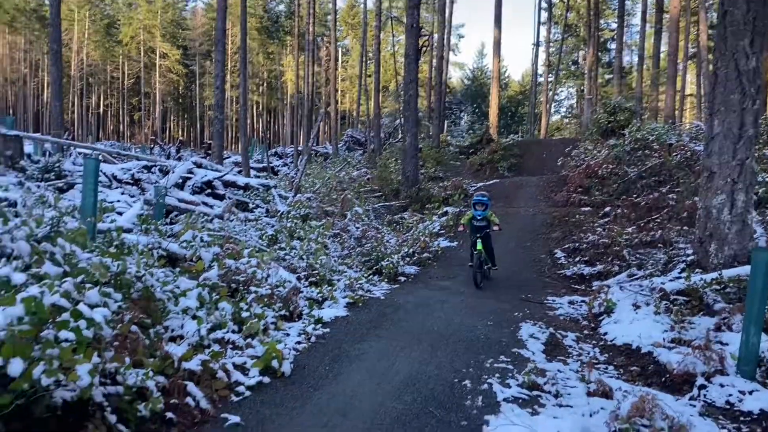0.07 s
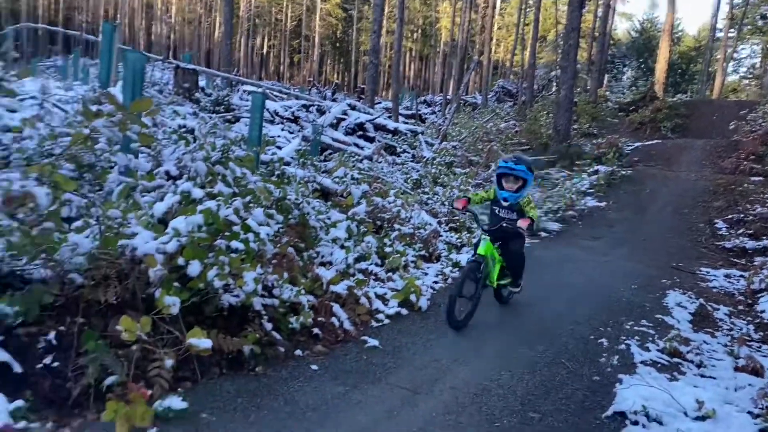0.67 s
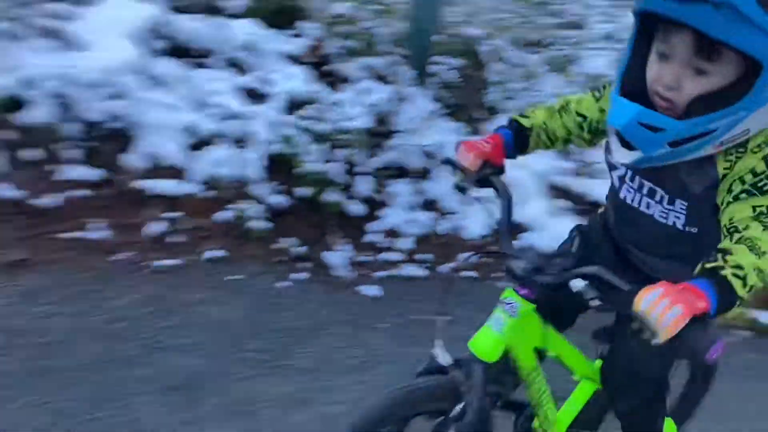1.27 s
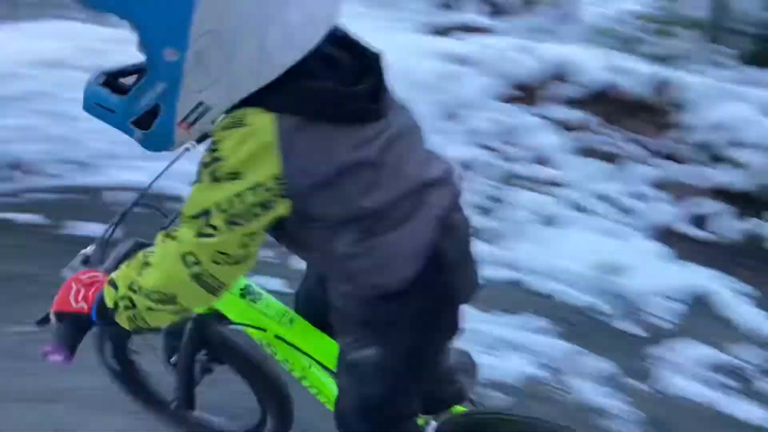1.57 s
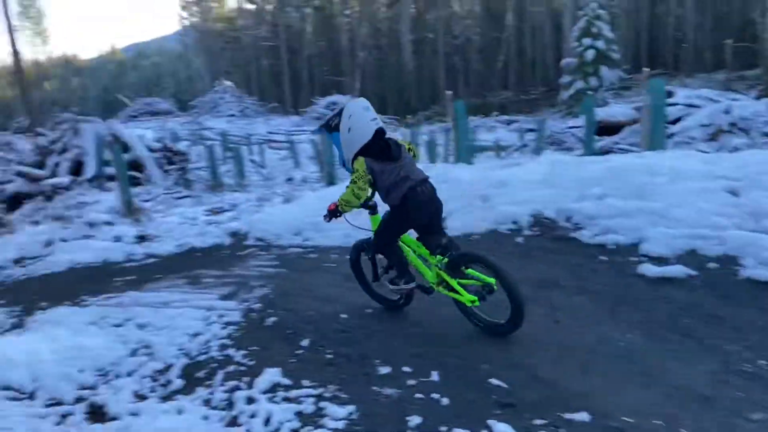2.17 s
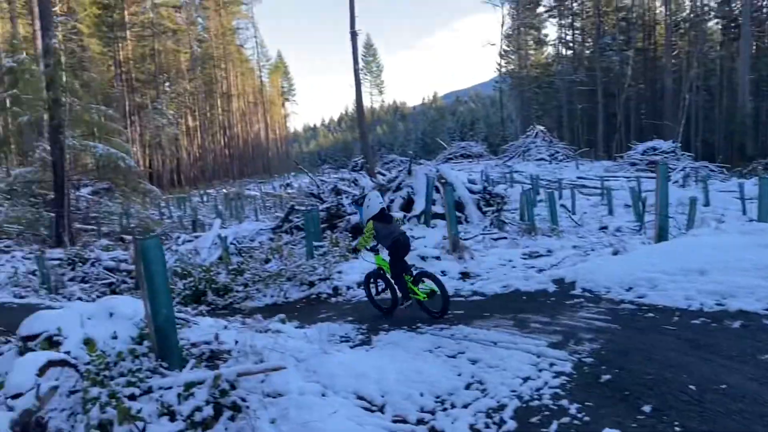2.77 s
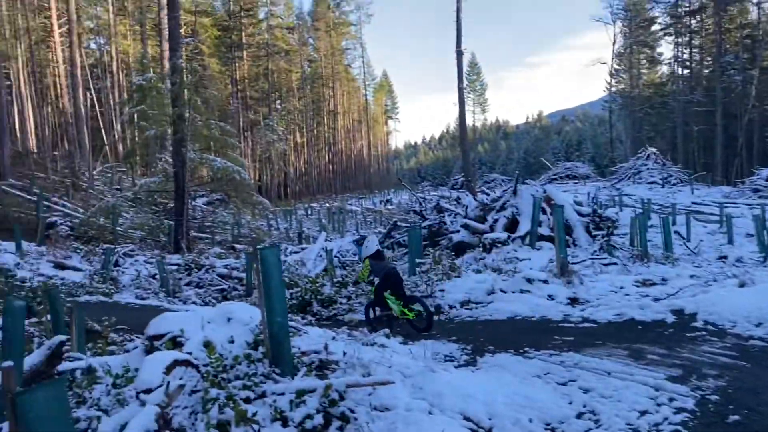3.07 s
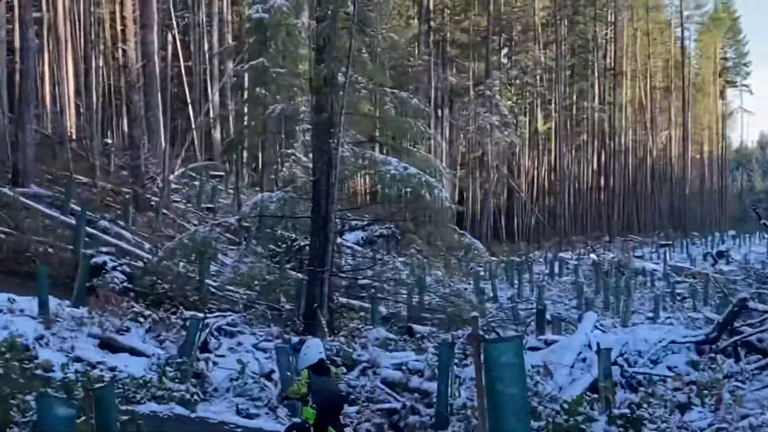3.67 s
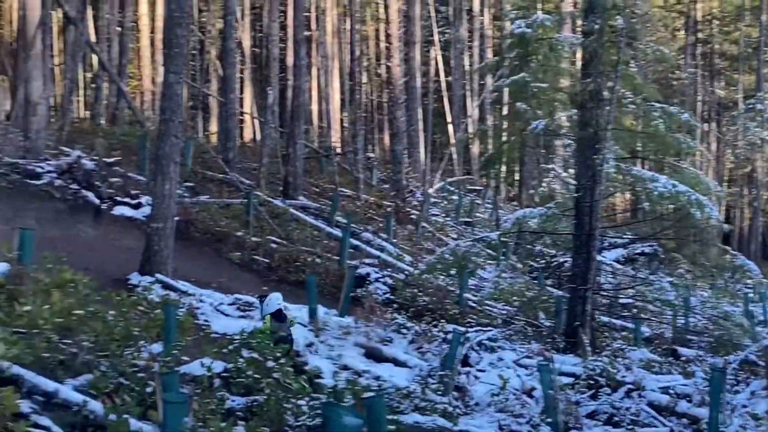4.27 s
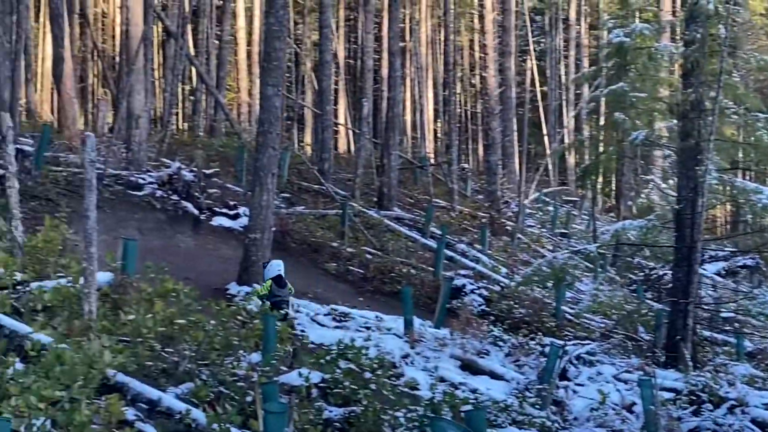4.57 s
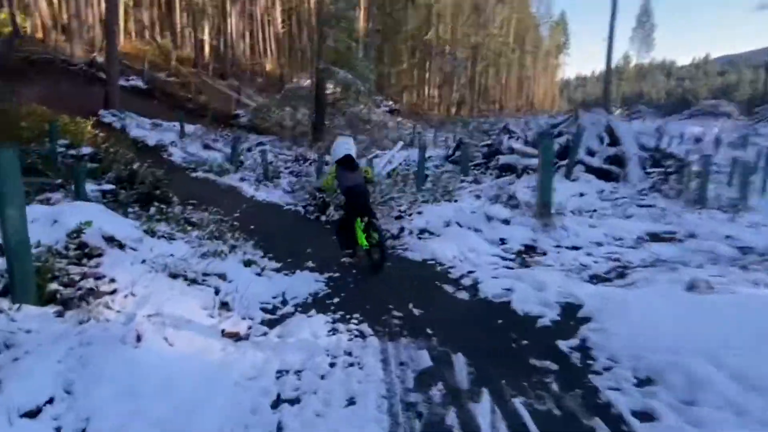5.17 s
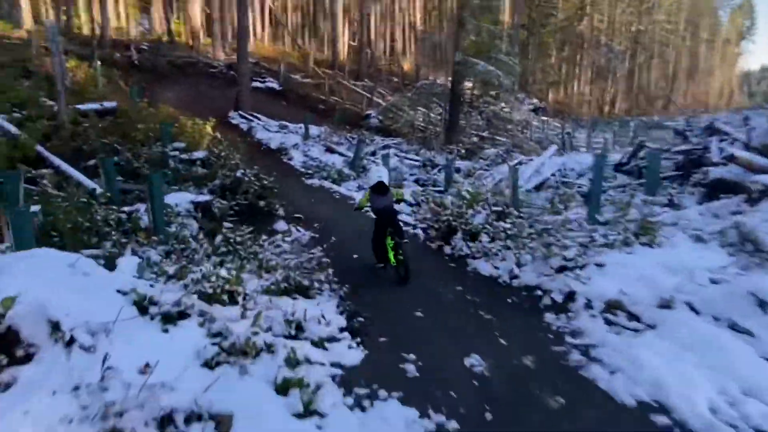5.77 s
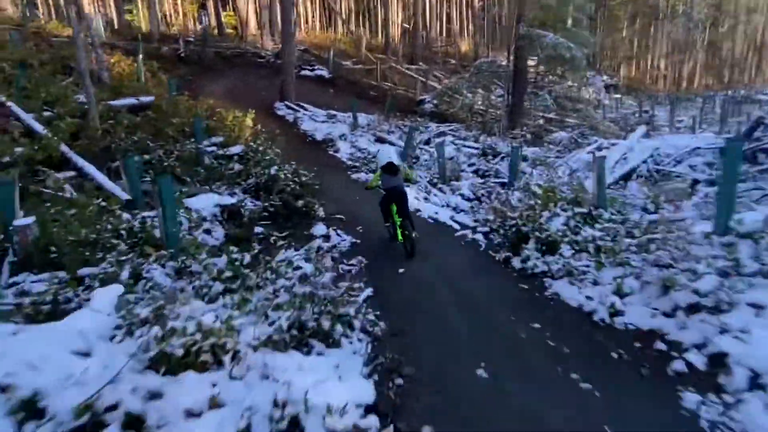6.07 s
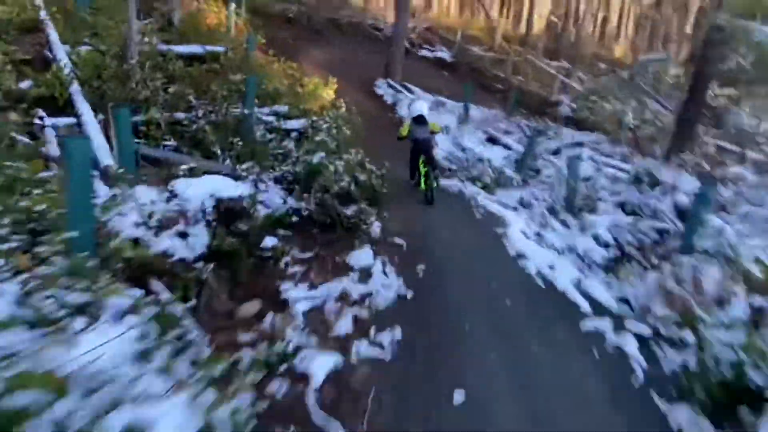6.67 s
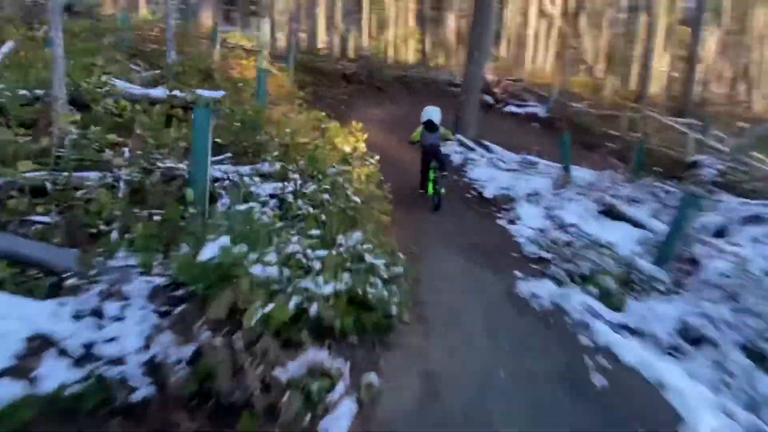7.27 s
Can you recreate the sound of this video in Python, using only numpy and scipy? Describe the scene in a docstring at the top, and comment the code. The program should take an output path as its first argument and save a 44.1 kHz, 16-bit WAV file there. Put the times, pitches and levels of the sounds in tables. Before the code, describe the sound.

From the start, a small bike approaches along a forest trail, its tyres crunching grit with a soft hum and sharp little stone snaps. It passes close to the microphone at about 1.3 seconds, knocking lightly over bumps as the hum drops in pitch. From 2 to 3 seconds grit sizzles as it takes a bend, then the crunch fades into the distance. A faint low rumble and a far engine drone lie underneath, the engine swelling slightly near 4.7 seconds. At about 5 seconds the sound switches abruptly to a microphone riding on a second bike. Close tyres crunch and rasp over gravel, stones flick, and the frame booms and knocks, with a clear knock near 5.9 seconds. Air buffets the microphone in low thumps, and from about 6.5 seconds a wide wind roar builds with speed, lasting until the end at around 7.5 seconds.

```python
"""On a gritty forest trail, a child's bike rolls past and away round a bend while a far engine drones.
Its tyres crunch grit, scuff soil and hum, growing louder as they come near. Then the scene changes:
the microphone rides along on a second bike, where close tyres crunch gravel, the frame booms and air
buffets the microphone's two openings (its ports). Both bikes flick stones and knock over bumps.
Each crunch is thousands of tiny clicks a second over a bed of hiss."""
import sys
import numpy as np
from scipy import signal
from scipy.fft import rfft, irfft, next_fast_len
from scipy.io import wavfile
from scipy.ndimage import uniform_filter1d, map_coordinates

SR = 44100
rng = np.random.default_rng(int(sys.argv[2]) if len(sys.argv) > 2 else 0)


def generate_wav(signal):
    """Clip the signal to [-1, 1] and save it as 16-bit WAV at the path in sys.argv[1]."""
    frames = np.transpose(np.atleast_2d(signal))
    scaled = np.clip(frames, -1, 1) * 32767
    pcm = np.round(scaled).astype(np.int16)
    wavfile.write(sys.argv[1], SR, pcm)


N = 331632
RIDE_START_S = 4.957
PRESS_S, EASE_S = 0.009, 0.019  # a tyre's load builds and lets go
OPPOSITE = np.array([[1], [-1]])  # plus on the left, minus on the right

# the far engine's main note: (time [s], level [dB])
ENGINE_LEVEL = [(0, -62.5), (2.2, -69), (3.0, -67), (3.7, -63.5), (4.3, -60), (4.7, -54.5), (4.85, -68)]
# its higher note, easing down towards the main one: (time [s], level [dB], pitch [Hz])
ENGINE_UPPER_NOTE = [(2.6, -76, 120), (2.85, -61, 113), (3.25, -59, 105), (3.45, -68, 101), (4.9, -81, 98)]

# the passing bike; extra grit as it leans in the bend: (time [s], distance [m], extra grit [dB])
PASS_PATH = [(0, 6.5, 1.5), (.3, 5.1, 0), (.75, 3.73, 4.5), (1.3, 1.53, -1), (1.7, 3.03, 4), (2.3, 4.95, 3),
             (3.0, 8.36, 6), (3.55, 13.3, 4), (4.0, 16.2, 7), (4.9, 18.5, -23.5)]
# its stereo picture, widest when near: (time [s], width [dB], left over right [dB])
PASS_STEREO = [(0, -12, -1.5), (.6, -19, -2), (1.0, -10, 0.5), (1.4, 4.5, 3.5), (1.8, -0.5, 0.5),
               (2.3, -7, 0), (3.0, -41, -1.5), (4.9, -31, -1.5)]
# its tyres bite (+) or go light (-): (start [s], length [s], grit change [dB], soil change [dB])
TYRE_BITES = [(0.002, 0.012, 11.5, 14.5), (.03, 0.1, 4, 5), (.29, 0.025, -7, -5), (.775, .17, 2, 2),
              (.828, 0.014, 3.5, 5.5), (.885, 0.04, 2, 2), (1.02, 0.062, -2, -4), (1.12, 0.024, 2.5, 0),
              (1.232, 0.026, 1.5, 1), (1.335, .025, 1, 3.5), (1.55, 0.02, 1, -1.5), (1.635, 0.04, 1, -1),
              (2.06, 0.027, 1, 1.5), (2.87, 0.167, 2, -3), (3.128, .014, 4.5, 7), (3.21, 0.077, 1.5, 2),
              (3.885, 0.1, 6.5, -2), (4.16, 0.1, -2, 5), (4.43, 0.028, -3, 8), (4.635, 0.013, 2, 11.5)]
# the hum of its tread: (time [s], pitch [Hz], level [dB])
TREAD_HUM = [(0, 542.5, -59), (.6, 563, -59), (1.1, 555.6, -56), (1.5, 398, -63), (2.2, 393, -72),
             (3.2, 399, -75), (4.1, 390, -71), (4.9, 377.5, -76)]
# a thin whine, grit sizzling in the bend and a last far crunch: (time [s], level [dB])
WHINE_LEVEL = [(2.7, -88), (2.8, -68.5), (3.25, -68.5), (3.5, -80), (4.2, -89), (4.5, -105)]
SIZZLE_LEVEL = [(1.2, -110), (1.8, -63), (2.2, -56.5), (2.6, -57.5), (3.02, -58.5), (3.12, -65),
                (3.9, -115)]
FAR_CRUNCH_LEVEL = [(3.8, -84), (4.18, -68.5), (4.45, -73), (4.7, -75), (4.92, -80)]

# air on the ride, rising with speed: (time [s], buffeting [dB], roar [dB])
AIR_LEVELS = [(5.0, -56, -91), (5.9, -55, -70), (6.1, -53, -64), (6.5, -54, -55), (6.8, -46, -47.5),
              (7.2, -51.5, -42.5), (7.52, -53, -45.5)]
# jolts swing the ports and thump the frame: (start [s], length [s], wind change [dB], boom change [dB])
RIDE_JOLTS = [(5.205, 0.059, 11.5, -3), (5.555, 0.018, 3, 7), (5.68, 0.06, 10, 1), (5.98, 0.065, 0, 6),
              (6.51, .015, -3, 5), (6.7, 0.088, 0, 5.5), (7.335, 0.024, 0, 1.5), (7.435, 0.026, 3, 6)]
# swirls of air that slap the ports: (time [s], level [dB], pitch [Hz])
EDDIES = [(4.99, -46, 75), (5.572, -39, 80), (5.755, -38, 72), (6.76, -40, 70), (6.875, -42, 50),
          (6.905, -42, 65), (7.04, -36.5, 62), (7.088, -38, 50), (7.19, -41.5, 46)]
# a hollow dip in the ride's tone: (time [s], centre [Hz], depth [0-1])
HOLLOW_SWEEP = [(5.0, 330, 0.35), (5.8, 324, 0.13), (6.2, 356, 0.5), (6.6, 454, 0.76), (7.0, 510, 0.8),
                (7.5, 540, 1)]
# the close tyres' crunch: (time [s], relative grit level [dB], relative gravel level [dB])
RIDE_CRUNCH = [(4.97, -42.5, -42.5), (5.3, -43, -41), (5.5, -40.5, -37.5), (5.68, -43.5, -41),
               (5.97, -45.5, -38.5), (6.35, -45, -39), (6.85, -41.5, -36.5), (7.15, -43, -37.5),
               (7.52, -43, -38)]
# they dig in (+) or skip (-): (start [s], length [s], grit change [dB], gravel change [dB])
TYRE_DIGS = [(5.12, 0.016, 4, 3.5), (5.212, 0.018, 5, 5), (5.25, 0.02, 5, 2), (5.528, 0.047, 2, 3.5),
             (5.905, 0.01, -0.5, 2), (5.96, 0.011, -4.5, -3), (6.1, 0.107, 1.5, 1), (6.39, 0.039, 0, 1.5),
             (6.48, 0.023, 2.5, 1.5), (6.562, 0.046, 4, 3.5), (6.62, .008, -4, -6), (6.648, 0.11, 3, 5),
             (6.8, 0.01, -1, 0.5), (6.85, 0.12, 2.5, 2.5), (7.385, 0.021, -6.5, -2)]
# they drum more as the speed rises: (time [s], boost of the low tones [dB])
DRUM_BOOST = [(5.0, -3), (5.35, -2.5), (5.7, 2.5), (6.7, -0.5), (7.1, 0.5), (7.52, 3)]
# a harsh ring flares now and then in the centre: (start [s], length [s], boost [dB], pitch [Hz])
RASP_FLARES = [(5.022, .022, 12.5, 3650), (5.11, 0.0503, 12, 3490), (5.25, .27, 5, 3355),
               (5.62, 0.17, 5, 3243), (6.09, .12, 6.5, 3850), (6.38, 0.052, 9, 3900),
               (6.71, 0.0288, 11, 3275), (6.86, 0.15, 13, 3495), (7.14, .14, 5, 3740)]
# steering swings them sideways: (time [s], left over right [dB])
STEERING = [(5.0, 0), (5.35, 3), (6.16, -3.5), (6.65, 2), (6.9, -2), (7.52, -3.5)]

# stones snapping under the tyres: (time [s], relative level [dB], pitch [Hz])
STONE_SNAPS = [(.0422, -29, 4000), (.0774, -28, 5400), (.174, -29, 4500), (.1764, -28, 4900),
               (.2274, -32, 4900), (.335, -28.5, 6000), (.3936, -28, 5000), (.3973, -25.5, 4300),
               (.6683, -18, 5300), (.695, -19, 4300), (.7013, -27, 5000), (.7043, -27, 5000),
               (.7782, -27.5, 5800), (.8445, -17, 5100), (.897, -18, 4700), (.9125, -24, 4300),
               (.9877, -28, 4300), (1.0801, -25, 4600), (1.1027, -16, 4400), (1.1073, -24, 4100),
               (1.1310, -18, 5200), (1.1431, -23, 5100), (1.2147, -24, 5000), (1.2326, -25, 4300),
               (1.2389, -21, 4200), (1.2497, -21.5, 3700), (1.2525, -23, 4500), (1.3068, -23, 4200),
               (1.3394, -25, 5100), (1.3485, -23, 3800), (1.3866, -20.5, 4900), (1.4257, -20.5, 4000),
               (1.4295, -23, 6500), (1.505, -27, 3900), (1.5145, -26, 3900), (1.5514, -24, 5000),
               (1.5632, -20, 4300), (1.5644, -23, 4000), (1.581, -22.5, 4000), (1.6402, -26, 4700),
               (1.6527, -21, 4400), (1.6725, -21.5, 4400), (1.9929, -22, 4900), (2.0197, -26, 4400),
               (2.0687, -27, 4900), (2.777, -29, 5600), (2.886, -30, 5400), (3.051, -31, 5200),
               (3.1408, -31.5, 5000), (3.7765, -34, 5900), (3.8676, -35.5, 6200), (3.9102, -33.5, 4900),
               (3.9122, -31.5, 5400), (3.9457, -29, 5200), (4.0452, -38, 5800), (4.0468, -38, 5800),
               (4.0999, -41, 5900), (4.9782, -22.5, 3300), (5.0153, -14.5, 3500), (5.0355, -23.5, 3640),
               (5.0548, -17, 3200), (5.1297, -23, 3500), (5.2135, -22, 2760), (5.2202, -19, 2900),
               (5.259, -19.5, 2600), (5.3159, -23, 3200), (5.4101, -26, 2900), (5.532, -22, 2800),
               (5.549, -21, 2500), (5.575, -20, 3000), (5.6206, -26, 3100), (5.708, -25, 3000),
               (5.876, -21, 2400), (5.9334, -26, 3700), (6.143, -17.5, 2600), (6.2716, -23, 2200),
               (6.5824, -22, 2600), (6.6557, -18, 2100), (6.7247, -14, 3100), (6.7472, -18, 2950),
               (6.846, -23, 3760), (6.9223, -18, 2600), (7.1058, -25, 3100), (7.2541, -17, 3300),
               (7.3075, -22.5, 2500), (7.3527, -20.5, 3400), (7.42, -25.5, 2600)]
# the bikes knocking over bumps: (time [s], relative level [dB], pitch [Hz], ring time [cycles])
BUMP_KNOCKS = [(.11, -38, 974, .45), (.887, -34, 1090, .45), (1.2184, -27, 1100, .45),
               (1.374, -33, 1600, .5), (1.4708, -22.5, 980, .5), (1.814, -33, 1250, .5),
               (1.9367, -29, 1050, .45), (3.353, -43, 1300, .5), (4.2335, -52, 2300, 1.4),
               (4.3978, -42, 1950, 1.4), (4.6317, -45.5, 2700, 1.5), (4.6378, -50, 2700, 1.2),
               (5.539, -29, 1950, .8), (5.828, -24, 1400, .55), (5.871, -29, 783, .6),
               (5.8772, -16.5, 1150, .6), (6.332, -29, 950, .8), (6.64, -24, 1140, .7),
               (6.678, -26, 1010, .9)]
# how each bike reaches the ports: (frequency [Hz], likeness [0-1], left over right [dB], left lead [rad])
PASS_AT_PORTS = [(500, 0.83, -2, -0.1), (1200, 0.99, 0.5, 0), (2240, 0.91, 0.5, 0), (3030, 0.7, 4.5, 0.53),
                 (5400, 0.3, 0, -0.5), (7040, 0.19, 2, 2.2), (8000, 0.36, 0.5, -1), (9800, 1, -3, -1.5),
                 (10400, 1, -4, -2.5), (11470, 0.48, 2, -5), (13500, 0.81, -2.5, -7), (14000, 0.31, 4, -9)]
RIDE_AT_PORTS = [(170, 0.88, -6, 0.5), (450, 0.62, 3.5, 2.95), (695, 0.4, 9.5, 2), (1130, 0.2, 15, 2.3),
                 (1780, 0.17, 8.5, 2), (2170, 0.58, 5.5, 2.87), (2820, 0.99, 5, 2.98), (3390, 0.68, 1, 2.5),
                 (3740, 0.46, 2, 2.45), (4740, 0.85, -1, 2.54), (5400, 0.72, -1.5, 5.8),
                 (7050, 0.64, 0, 6.7), (8800, 0.35, 1, 9.4), (11400, 0.89, 0.5, 8.63)]

# the tone colour of each noise: (frequency [Hz], relative level [dB])
RUMBLE_TONE = [(20, -32), (40, -27), (60, -4), (90, -0.5), (120, -2.5), (180, -6), (260, -17), (600, -58)]
WIND_TONE = [(15, -24), (30, -27), (50, 0), (90, 0.5), (140, -5.5), (200, -13), (350, -16), (900, -30)]
FRAME_TONE = [(130, -8), (210, -8), (270, 4), (320, -7), (420, -13), (800, -31)]
CASING_TONE = [(100, -14), (200, -5), (300, 2), (420, 0.5), (580, 0), (780, -5), (1200, -15.5), (3000, -49)]
SOIL_TONE = [(400, -13), (800, -2), (1300, -1.5), (2200, -3), (3000, -2.5), (4500, -32), (8000, -36)]
GRIT_TONE = [(1500, -20), (2500, -11.5), (3500, -3.5), (5000, 0), (6500, -3.5), (8200, -5.5), (10000, -10),
             (12500, -8), (14000, -4), (15000, -44)]
SIZZLE_TONE = [(2500, -33), (4000, -6), (5100, 1.5), (6400, -2), (8000, -7.5), (11000, -36)]
GRAVEL_TONE = [(150, -46), (300, -21), (450, -8), (700, -8.5), (1100, -1), (1550, -9.5), (1900, -7.5),
               (2750, 3.5), (3300, -1), (3700, -9), (4100, -13.5), (4600, -11.5), (5500, -17), (7000, -26),
               (11000, -30.5), (12500, -28), (14500, -46)]
ROAR_TONE = [(40, -20), (100, -5), (260, 6), (450, 0), (800, -26)]
FAR_CRUNCH_TONE = [(1200, -46), (2300, 1.5), (3300, 6), (4300, 1), (6000, -13), (9000, -28)]


def amp(db):
    """Turn decibels into a number to multiply by."""
    return 10 ** (np.asarray(db) / 20)


def unit(x):
    """Scale a sound so that its stereo centre has an average strength (rms) of 1."""
    return x / np.sqrt(np.mean(np.atleast_2d(x).mean(0) ** 2) + 1e-20)


def along(table, hz):
    """Read each column of a frequency table at hz, on a log scale."""
    known_hz, *columns = np.transpose(table)
    return [np.interp(np.log(hz + 1), np.log(known_hz + 1), column) for column in columns]


def curves(table):
    """Join the dots of a time table: one value per sample for each column after the time."""
    times, *columns = np.transpose(table)
    return [np.interp(np.arange(N) / SR, times, column) for column in columns]


def swells(table, rise_s, fall_s):
    """Events rise, hold and fall: one curve for each column after the start and length."""
    t, table = np.arange(N) / SR, np.array(table)
    ramps = [np.minimum((t - start) / rise_s, (start + length - t) / fall_s)
             for start, length in table[:, :2]]
    return table[:, 2:].T @ np.clip(np.array(ramps) + 1, 0, 1)


def wobble(rate):
    """A smooth curve through random points, rate of them a second."""
    return map_coordinates(rng.standard_normal(int(N * rate / SR) + 4), [np.arange(N) * rate / SR])


def filtered(x, response):
    """Multiply each frequency in a sound by response(hz)."""
    size = next_fast_len(N + SR // 2)
    return irfft(rfft(x, size) * response(np.fft.rfftfreq(size, 1 / SR)), size)[..., :N]


def muffled(x, above_hz, steepness):
    """Fade out the high tones."""
    return filtered(x, lambda hz: 1 / (1 + (hz / above_hz) ** steepness))


def coloured(x, tone):
    """Give a sound a tone colour, at strength 1."""
    return unit(filtered(x, lambda hz: amp(along(tone, hz)[0])))


def rush(tone, width):
    """Stereo noise; at width 0 left and right are the same."""
    mid, side = rng.standard_normal((2, N))
    return coloured(mid + width * side * OPPOSITE, tone)


def fuzzy_note(pitch_hz, width_hz):
    """A narrow band of noise around one pitch."""
    phase = 2 * np.pi * np.cumsum(pitch_hz * np.ones(N)) / SR
    return unit(wobble(width_hz) * np.sin(phase) + wobble(width_hz) * np.cos(phase))


def panned(db):
    """Left and right gains that make the left side db louder."""
    return amp(OPPOSITE * db / 2)


def at_ports(common, apart, ports):
    """Two sounds become a left-right pair, shaded and delayed by the microphone's housing."""
    def response(hz, weight):
        likeness, tilt_db, lead = along(ports, hz)
        share = np.sqrt((1 + weight * np.clip(likeness, 0, 1)) / 2)
        gain = panned(tilt_db)
        return share * gain / np.linalg.norm(gain, axis=0) * np.exp(1j * OPPOSITE * lead / 2)
    shared = filtered(common, lambda hz: response(hz, 0.35))
    return shared + OPPOSITE * filtered(apart, lambda hz: response(hz, -1))


def patchy(x, depth_db):
    """Narrow bands of pitch swell and sink on their own, each for about a tenth of a second."""
    bands = signal.stft(x, nperseg=512)[2]
    patches = uniform_filter1d(rng.standard_normal(bands.shape[1:]), size=3, axis=0)
    patches = uniform_filter1d(patches, size=14, axis=1)
    gain = amp(depth_db * unit(patches.ravel()).reshape(patches.shape))
    return signal.istft(bands * gain, nperseg=512)[1][:, :N]


def hollowed(x):
    """A wavering dip climbs in pitch, thinning the stereo centre and leaving the sides."""
    hz, t, bands = signal.stft(x.mean(0), SR, nperseg=2048)
    times, centre_hz, depth = np.transpose(HOLLOW_SWEEP)
    octaves = np.log2((hz[:, None] + 1) / np.interp(t, times, centre_hz))
    waver = .14 * np.interp(t * SR, np.arange(N), wobble(12))
    dip = np.clip(np.interp(t, times, depth) + waver, 0, 1) * np.exp(-(octaves / 0.33) ** 2)
    return x - signal.istft(bands * dip, SR, nperseg=2048)[1][:N]


def distance_db(loss_db_per_m):
    """The passing bike's sound thins as it spreads, and snow and brush soak up some each metre."""
    metres = np.maximum(curves(PASS_PATH)[0], .5)
    return -20 * np.log10(metres) - loss_db_per_m * metres


def far_engine():
    """A far engine drones, and a higher note beats against it."""
    pitch_hz = 96.5 + 1.596 * wobble(5)
    phase = 2 * np.pi * np.cumsum(pitch_hz) / SR
    drone = unit(np.sin(phase) + amp(-16.5) * np.sin(2 * phase))
    drone *= amp(curves(ENGINE_LEVEL)[0] + 1.9 * wobble(7.24))
    upper_db, upper_hz = curves(ENGINE_UPPER_NOTE)
    upper = unit(np.sin(2 * np.pi * np.cumsum(upper_hz) / SR))
    return drone + upper * amp(upper_db + 1.5 * wobble(8))


def rumble():
    """A steady far rumble; the passing bike's thrum adds to it when close."""
    steady, thrum = amp(-63), amp(-46.5 + distance_db(0.2))
    return np.hypot(steady, thrum) * rush(RUMBLE_TONE, width=0.23)


def low_thump(start_s=3.36, level_db=-59, decay_s=0.022):
    """One low thump pushes on one port and pulls on the other."""
    age = np.maximum(np.arange(N) / SR - start_s, 0) / decay_s
    return amp(level_db) * age * np.exp(1 - age) * rush(WIND_TONE, width=0) * OPPOSITE


def eddy_thumps(fade_cycles=0.7):
    """Swirls of air slap both ports: a low push and pull, over in two or three swings."""
    out = np.zeros(N)
    for time_s, db, hz in EDDIES:
        cycles = hz * (np.arange(N) / SR - time_s)
        out += amp(db) * np.sin(2 * np.pi * cycles) * np.exp(-(cycles / fade_cycles) ** 2)
    return out


def frame_and_wind():
    """Jolts swell the frame's boom and the wind on the ports; a wide roar grows with speed."""
    wind_db, roar_db = curves(AIR_LEVELS)
    gust_db, jolt_db = swells(RIDE_JOLTS, rise_s=0.029, fall_s=0.047)
    boom = amp(-52 + jolt_db + 2.5 * wobble(14)) * rush(FRAME_TONE, width=0.039)
    wind = amp(wind_db + gust_db) * unit(amp(2.1 * wobble(20)) * rush(WIND_TONE, width=0.013))
    roar = amp(roar_db) * coloured(rng.standard_normal(N), ROAR_TONE)
    return boom + wind + roar * OPPOSITE


def tread_hum():
    """The tread's hum drops in pitch as the bike goes by; a thin, wide whine follows in the bend."""
    pitch_hz, hum_db = curves(TREAD_HUM)
    hum = amp(hum_db) * fuzzy_note(pitch_hz, width_hz=220)
    mid, side = [fuzzy_note(1450, width_hz=230) for _ in range(2)]
    whine = mid + amp(3.5) * side * OPPOSITE
    return hum + amp(curves(WHINE_LEVEL)[0] + 2 * wobble(14)) * whine


def contact(hz, cycles, scrape, scrape_s):
    """One hit rings briefly (the shorter, the more its pitch sinks), and crumbs chatter after it."""
    t = np.arange(SR // 20) / SR
    age = hz * t / cycles
    sink = min(.8, .3 / cycles ** 2)
    phase = 2 * np.pi * cycles * ((1 - .4 * sink) * age + sink * (1 - np.exp(-age)))
    ring = np.sin(phase) * age * np.exp(1 - age)
    band = signal.butter(2, [hz / 2.4, min(1.7 * hz, SR / 3)], "band", fs=SR)
    chatter = unit(signal.lfilter(*band, rng.standard_normal(len(t)))) * np.exp(-t / scrape_s)
    bass_cut = signal.butter(2, hz / 3.2, "high", fs=SR)
    hit = signal.lfilter(*bass_cut, ring + scrape * chatter)
    return hit / np.abs(hit).max()


def strikes(table, scrape, scrape_s):
    """Place one hit for each row of a table."""
    out = np.zeros(N + SR)
    for time_s, db, hz, cycles in table:
        hit = contact(hz, cycles, scrape, scrape_s)
        out[round(time_s * SR):][:len(hit)] += amp(db) * hit
    return out[:N]


def stones_and_bumps():
    """Stones snap and the bikes knock: one version for the passing bike, one for the ride."""
    stones = [(*row, rng.uniform(.66, .86)) for row in STONE_SNAPS]  # add a ring time in cycles
    snaps = strikes(stones, scrape=.25, scrape_s=.002)
    knocks = strikes(BUMP_KNOCKS, scrape=.22, scrape_s=.004)
    passing = at_ports(amp(2.3) * snaps + amp(2.5) * knocks, np.zeros(N), PASS_AT_PORTS)
    close = amp(5.5) * snaps + amp(3) * knocks
    direct = amp(-14.5) * close  # reaches both ports alike
    riding = at_ports(close, np.zeros(N), RIDE_AT_PORTS) + direct
    return passing, muffled(riding, above_hz=6500, steepness=4)  # the wheel shades the highs


def crunch(per_second, spread_db, hiss_db, clumps):
    """Grains click at many pitches, a few of them loudly, over the hiss of countless small ones."""
    when, pitch, luck, phase = rng.random((int(per_second * N / SR), 4)).T
    hz = 700 * 20 ** pitch
    cycles = hz[:, None] * np.arange(128) / SR
    size = hz * amp(spread_db * np.minimum(-np.log(1 - luck), 4.3))
    grains = size[:, None] * np.exp(-1.5 * cycles) * np.sin(2 * np.pi * (cycles + phase[:, None]))
    index = (when * N).astype(int)[:, None] + np.arange(cycles.shape[1])
    clicks = np.bincount(index.ravel(), grains.ravel(), N)[:N]  # add each grain at its time
    return clumps * (unit(clicks) + amp(hiss_db) * rng.standard_normal(N))


def passing_tyres():
    """Tyres press clumps of grit, scuff the soil below and drum with their rubber casings."""
    bite_db, scuff_db = swells(TYRE_BITES, PRESS_S, EASE_S)
    grit_db = -37 + distance_db(0.5) + curves(PASS_PATH)[1] + bite_db
    soil_db = -41 + distance_db(0.55) + scuff_db
    width_db, pan_db = curves(PASS_STEREO)
    clumps = amp(1.2 * wobble(35) + 1.2 * wobble(220))
    fine = [crunch(per_second=2800, spread_db=3.6, hiss_db=-.5, clumps=clumps) for _ in range(2)]
    coarse = [crunch(per_second=1200, spread_db=3.5, hiss_db=1.5, clumps=clumps) for _ in range(2)]
    grit = patchy(at_ports(fine[0], amp(width_db) * fine[1], PASS_AT_PORTS), depth_db=1.86)
    grit = amp(grit_db) * panned(pan_db) * coloured(grit, GRIT_TONE)
    soil = amp(soil_db) * coloured(at_ports(*coarse, PASS_AT_PORTS), SOIL_TONE)
    far_crunch = amp(curves(FAR_CRUNCH_LEVEL)[0]) * coloured(coarse[0], FAR_CRUNCH_TONE)
    sizzle = amp(curves(SIZZLE_LEVEL)[0]) * coloured(fine[0], SIZZLE_TONE)
    casings = amp(-43 + distance_db(0.5)) * rush(CASING_TONE, width=0.22)
    return grit + sizzle + soil + far_crunch + casings


def centre_ring(resting_db=-56.5):
    """A harsh ringing flares now and then in the stereo centre, at a new pitch with each flare."""
    flare_db = swells(RASP_FLARES, PRESS_S, EASE_S)[0]
    held_pitches = [(t, hz) for start, length, _, hz in RASP_FLARES for t in (start, start + length)]
    return amp(resting_db + flare_db) * fuzzy_note(curves(held_pitches)[0], width_hz=600)


def close_tyres():
    """Gravel crunches right below the microphone and a harsh ring flares in the centre; fine grit sprays above
    the stones."""
    grit_db, gravel_db = curves(RIDE_CRUNCH) + swells(TYRE_DIGS, PRESS_S, EASE_S)
    clumps = amp(1.25 * wobble(45) + 1.4 * wobble(260))
    pair = [crunch(per_second=2600, spread_db=3.5, hiss_db=1, clumps=clumps) for _ in range(2)]
    crackle = coloured(patchy(at_ports(*pair, RIDE_AT_PORTS), depth_db=2.0), GRAVEL_TONE)
    coarse = muffled(crackle, above_hz=4100, steepness=8)
    drumming = (amp(curves(DRUM_BOOST)[0]) - 1) * muffled(coarse, above_hz=1700, steepness=8)
    gravel = amp(gravel_db - 3.5) * unit(coarse + drumming) * panned(curves(STEERING)[0])
    grit = amp(grit_db - 2.5) * unit(crackle - coarse)
    return gravel + grit + clumps * centre_ring()


def scene():
    """First we stand by the trail as a bike passes, then we ride along on another."""
    passing_hits, riding_hits = stones_and_bumps()
    standing = passing_tyres() + tread_hum() + passing_hits + far_engine() + rumble() + low_thump()
    riding = hollowed(close_tyres() + riding_hits + frame_and_wind() + eddy_thumps())
    riding -= filtered(riding.mean(0), lambda hz: hz > 11200)  # the highest fizz stays only at the sides
    fade = np.clip((np.arange(N) / SR - RIDE_START_S) / 0.019 + 0.5, 0, 1)
    return (1 - fade) * standing + fade ** 2 * riding


def record(dry):
    """The microphone keeps nothing above 15.8 kHz."""
    return filtered(dry, lambda hz: hz < 15800)


dry = scene()
out = record(dry)
generate_wav(out)
```